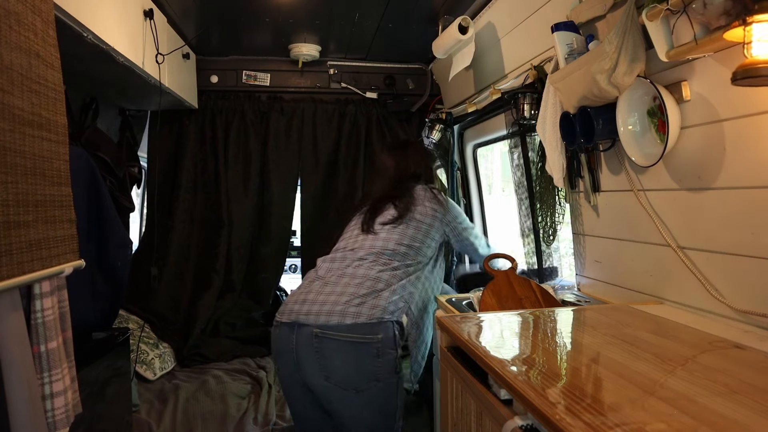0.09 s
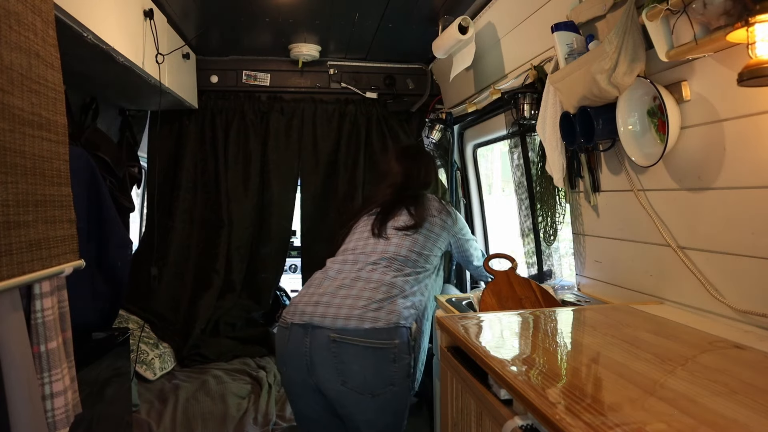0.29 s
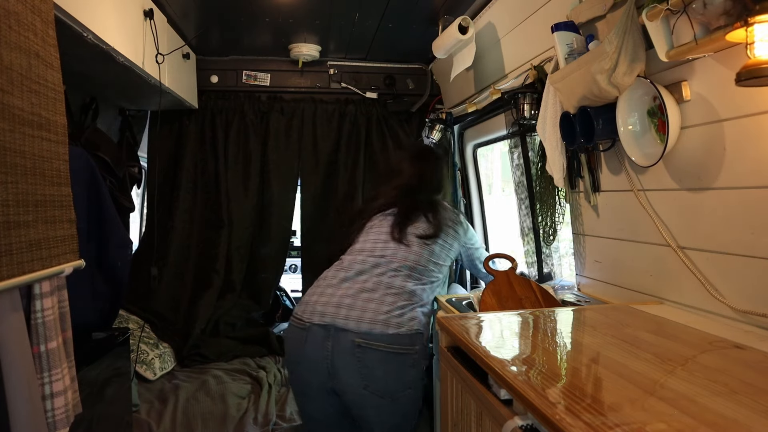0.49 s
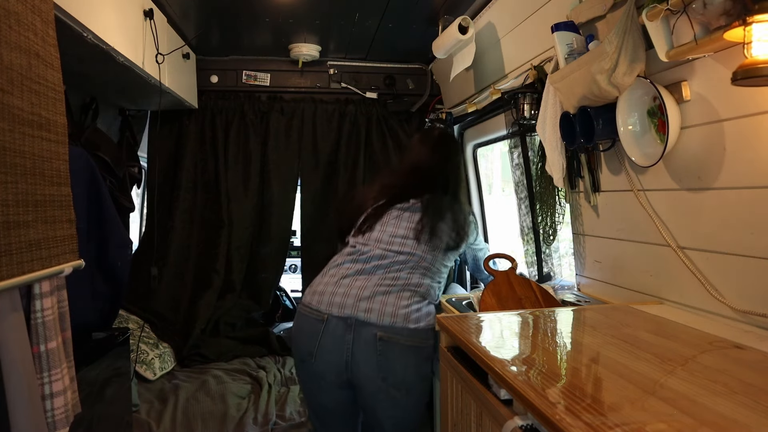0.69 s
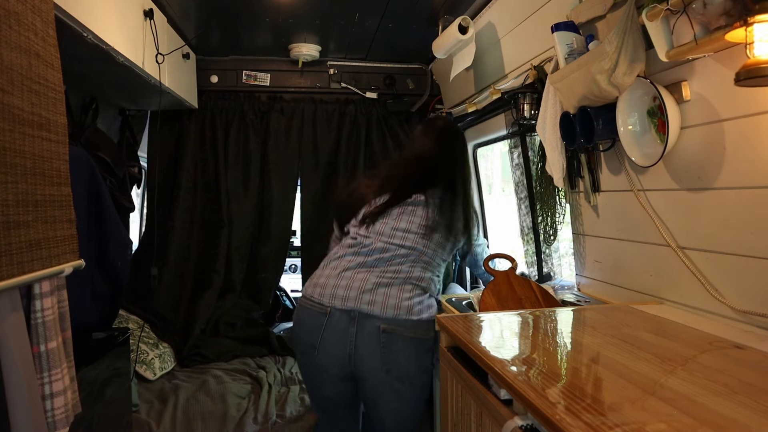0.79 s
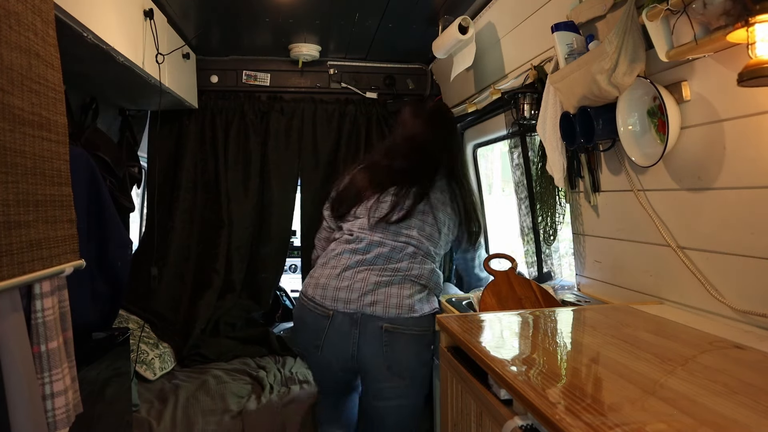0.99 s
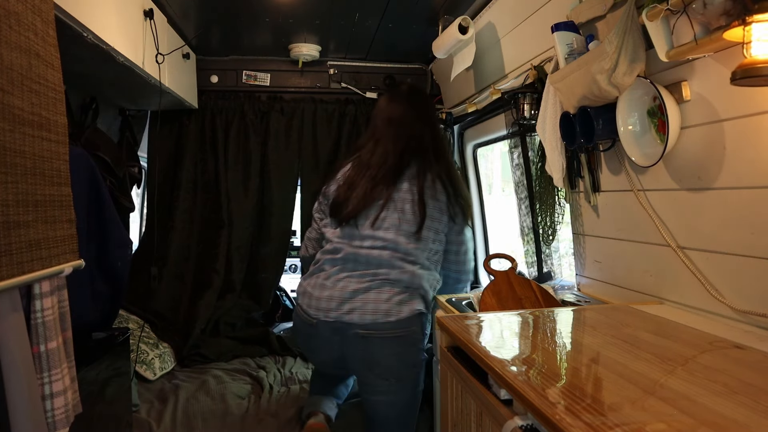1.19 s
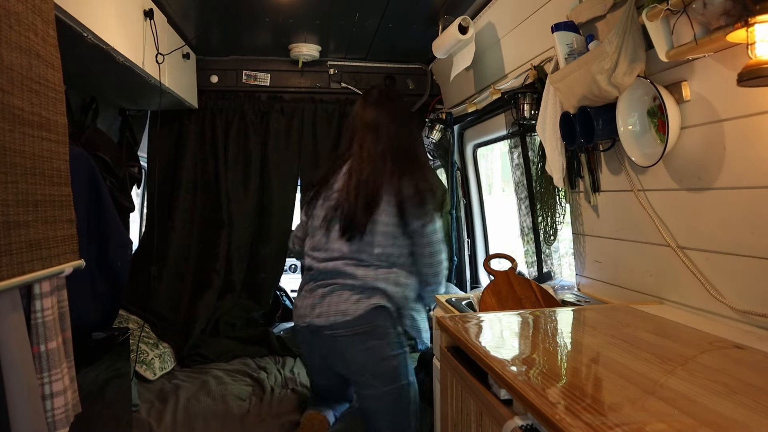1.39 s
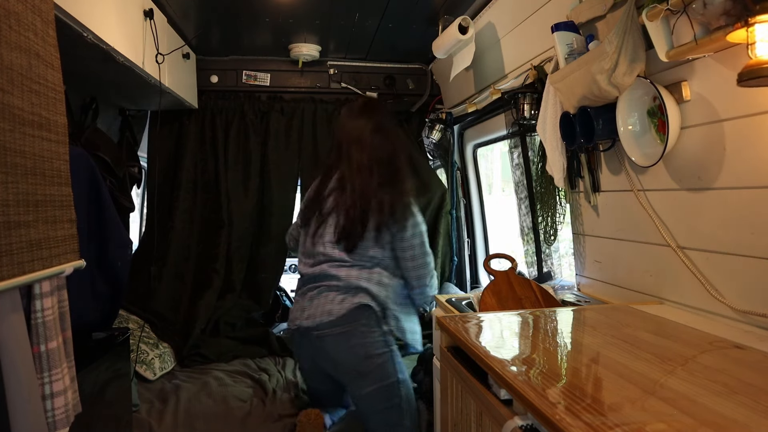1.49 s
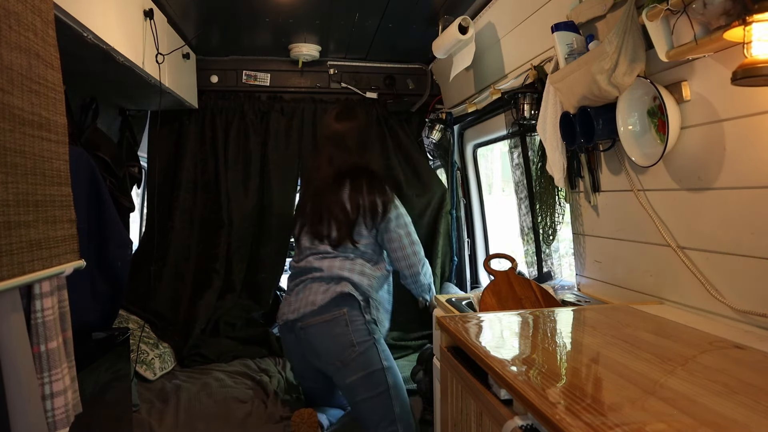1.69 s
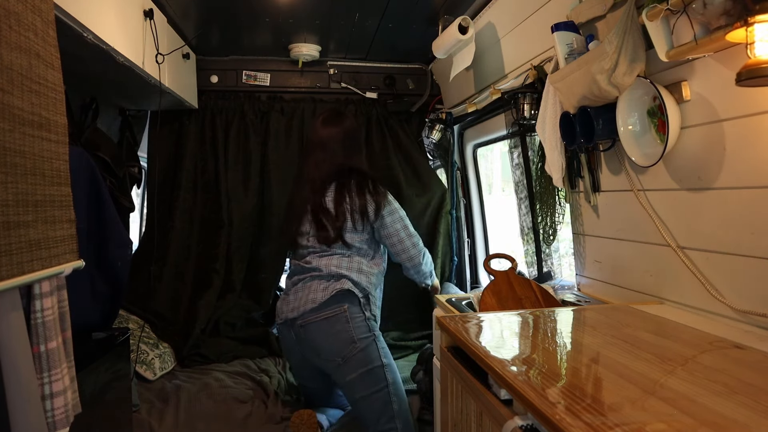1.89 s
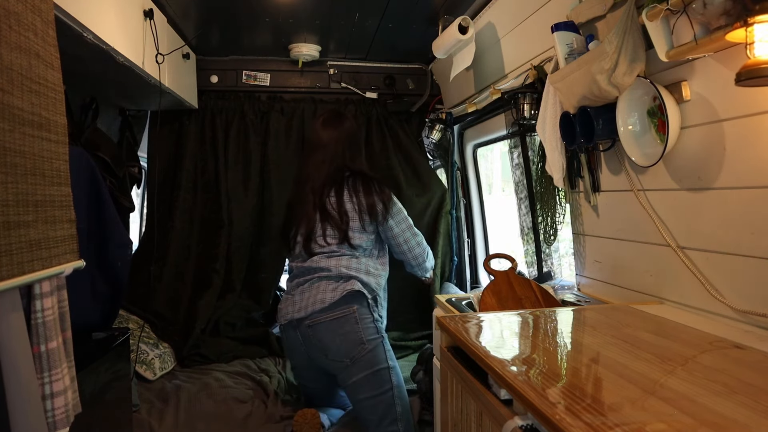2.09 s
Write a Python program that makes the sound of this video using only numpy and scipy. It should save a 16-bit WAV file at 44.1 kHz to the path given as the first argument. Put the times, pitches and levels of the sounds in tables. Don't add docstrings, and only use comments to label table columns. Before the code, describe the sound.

Heavy cloth is rustled and folded very close to the microphone in a small parked van; a loud, sharp wooden knock comes early, then soft thuds, light taps and stick-slip jerks over low rumble.

```python
import sys
import numpy as np
from scipy import signal
from scipy.fft import rfft, irfft
from scipy.io import wavfile
from scipy.ndimage import uniform_filter1d

SR = 44100
rng = np.random.default_rng(int(sys.argv[2]) if len(sys.argv) > 2 else 0)


def master_out(mix):
    frames = np.transpose(np.atleast_2d(mix))
    ceiling = np.clip(frames, -1, 1)
    pcm = np.round(ceiling * 32767).astype(np.int16)
    wavfile.write(sys.argv[1], SR, pcm)


def ratio_of_db(decibels):
    return 10 ** (np.asarray(decibels, float) / 20)


N = 92610


def evened(x):
    return x / np.sqrt(np.mean(x ** 2) + 1e-20)


def read(points, hz):
    f, value = np.transpose(points)
    return np.interp(np.log(hz + 1), np.log(f + 1), value)


def colour(x, points):
    gain = ratio_of_db(read(points, np.fft.rfftfreq(2 * len(x), 1 / SR)))
    return irfft(rfft(np.r_[x, x[::-1]]) * gain)[:len(x)]


def add(mix, s, sound):
    part = mix[round(s * SR):][:len(sound)]
    part += sound[:len(part)]


def resonate(x, hz, width):
    turn = np.exp(2j * np.pi * hz * np.arange(len(x)) / SR)
    r = np.exp(-np.pi * width / SR)
    return 2 * (turn * signal.lfilter([1 - r], [1, -r], x / turn)).real


def body_noise(noise, hz, width, second_width):
    return resonate(resonate(noise, hz, width), hz, second_width)


def swing(hz, count):
    return np.sin(2 * np.pi * hz * np.arange(count) / SR)


def drift(span_s):
    size = round(span_s * SR)
    return evened(uniform_filter1d(uniform_filter1d(rng.standard_normal(N), size), size))


def burst(sound, rise_s, t60):
    t = np.arange(len(sound)) / SR
    x = sound * (1 - np.exp(-t / rise_s)) * ratio_of_db(-60 * t / max(t60, 0.01))
    return x / abs(x).max()


def cloth():
    # time in seconds, effort in dB, brightness in dB.
    handling = [(0, -47.5, 20), (0.199, -45, 8), (0.312, -40.5, 6.5), (.35, -52.5, -8), (0.468, -46, 24.5),
                (.61, -47.5, 16), (.78, -47, -6), (.95, -44, 19), (1.08, -45, 18), (1.2, -61, 23),
                (1.362, -51.5, -4.5), (1.479, -45.5, 8), (1.561, -37, -17.5), (1.671, -40.5, -10),
                (1.72, -51, -19.5), (1.9, -46.5, 0.5), (1.98, -72, -54), (2.1, -53.5, -39)]
    # frequency in Hz, level in dB per Hz.
    weave = [(100, -63), (300, -5), (900, -1.5), (2100, 0), (3200, -8.5), (5500, -22.5), (9500, -38),
             (15500, -67.5)]
    bright_hz, fibres_per_s, fibre_share = 7130, 3000, 0.61
    fibre_spread_db, patchy_db, flutter_db = 1, 3, -0.17

    slip_size = ratio_of_db(fibre_spread_db * np.minimum(rng.exponential(1, N), 4))
    slips = slip_size * (rng.random(N) < fibres_per_s / SR)
    fibres = evened(slips * rng.standard_normal(N))
    rub = fibre_share * fibres + (1 - fibre_share) * rng.standard_normal(N)
    rub = rub * ratio_of_db(flutter_db * drift(0.0053))

    hz, t, z = signal.stft(rub, SR, nperseg=256)
    chance = rng.standard_normal(z.T.shape)
    patches = evened(uniform_filter1d(uniform_filter1d(chance, 10, 0), 3, 1)).T
    z = z * ratio_of_db(read(weave, hz)[:, None] + patchy_db * patches)
    level = np.sqrt(np.mean(signal.istft(z, SR, nperseg=256)[1] ** 2))

    s, effort_db, bright_db = np.transpose(handling)
    upper = 1 / (1 + (bright_hz / (hz + 1)) ** 4)
    z = z * ratio_of_db(np.interp(t, s, effort_db) + 0.5 + upper[:, None] * np.interp(t, s, bright_db))
    return signal.istft(z, SR, nperseg=256)[1][:N] / level


def knock():
    # frequency in Hz, level in dB, t60 in seconds.
    wood = [(330, -21.5, 0.044), (440, -13, 0.1), (763, -20.5, 0.55), (879, 2, 0.035), (973.5, 5, 0.024),
            (1047, -16, 0.13), (1117, 5.5, 0.023), (1535, -1, 0.029), (1760, 3.5, 0.023),
            (2080, -1.5, 0.076), (2298, 6.5, 0.014), (2790, -18, 0.064), (3960, -43, .04),
            (4400, -39.5, .04)]
    # delay in seconds, level in dB.
    bounces = [
        (0, -18.5),
        (.0011, 4.5),
        (.004, -12),
        (.0075, -5),
        (0.011, -7),
        (0.015, -22.5),
        (.02, -40.5),
    ]
    # frequency in Hz, level in dB per Hz.
    crack_spectrum = [(1500, -18), (3500, 11), (5000, -9), (8000, 8), (15800, -11)]
    # frequency in Hz, gain in dB.
    knock_tone = [(60, -4), (250, 0), (16000, -6)]
    knock_s, knock_db, blow_rise_s = 0.2124, -10.5, 0.0002
    crack_db, crack_rise_s, crack_t60_s = -25, 0.00013, 0.013

    t = np.arange(SR // 2) / SR
    ring = sum(ratio_of_db(db - 60 * t / t60) * np.sin(2 * np.pi * hz * t) for hz, db, t60 in wood)
    ring = ring * (1 - np.exp(-(t / blow_rise_s) ** 2))
    out = np.zeros(N)
    for delay, db in bounces:
        add(out, knock_s + delay, ratio_of_db(knock_db + db) * ring)
    crack = burst(colour(rng.standard_normal(2048), crack_spectrum), crack_rise_s, crack_t60_s)
    add(out, knock_s + 0.0028, ratio_of_db(crack_db) * crack)
    return colour(out, knock_tone)


def thuds():
    # start in seconds, peak in dB, body in Hz, t60 in seconds.
    floor_hits = [(0.263, -28, 105, 0.023), (0.284, -24, 326, 0.07), (0.298, -34, 434, 0.053),
                  (0.311, -38.5, 302, 0.072), (0.378, -29.5, 166.7, 0.28), (.415, -23.5, 286.7, 0.12),
                  (.418, -21, 161, 0.044), (0.456, -31.5, 81.6, 0.046), (0.511, -31, 472, 0.056),
                  (0.549, -29, 149.2, 0.04), (0.835, -38, 78.5, 0.09), (.79, -40.5, 126.6, 0.24),
                  (1.015, -29, 196, 0.025), (1.07, -29.5, 268, 0.039), (1.163, -32, 250, 0.026),
                  (1.40, -39.5, 68, 0.16), (1.529, -26, 195.8, 0.095), (1.578, -33.5, 302, 0.17),
                  (1.59, -28.5, 905, 0.26), (1.675, -28.5, 798, 0.1), (1.631, -32.5, 106, 0.037),
                  (1.75, -40.5, 557, 0.091), (0.772, -31.5, 242, 0.13), (1.612, -30, 278.5, 0.1),
                  (1.897, -32.5, 116, 0.12), (1.889, -25, 863, 0.1), (2.027, -34, 88, 0.099),
                  (2.079, -30.5, 193, 0.13)]
    rise_s, wide, roughness = 0.0046, 0.45, 0.55
    upper_ratio, upper_db = 1.7, -2
    out = np.zeros(N)
    for s, db, hz, t60 in floor_hits:
        n = rng.standard_normal(9000)
        body = evened(body_noise(n, hz, wide * hz, 2 * wide * hz))
        upper = evened(body_noise(n, upper_ratio * hz, hz, hz))
        rough = roughness * hz / 250 * (body + ratio_of_db(upper_db) * upper)
        add(out, s, ratio_of_db(db) * burst(swing(hz, len(n)) + rough, rise_s, t60))
    return out


def taps():
    # start in seconds, peak in
    # dB, body in Hz, t60 in seconds.
    small_things = [(0.175, -34, 1630, 0.052), (1.54, -24.5, 1950, 0.041), (0.415, -24.5, 900, 0.12),
                    (1.614, -47.5, 1750, 0.13), (0.788, -34, 1010, 0.25), (0.811, -26, 1850, 0.044),
                    (0.2153, -10, 2100, 0.066), (0.886, -35.5, 1390, 0.087), (0.994, -28.5, 1890, 0.2),
                    (1.058, -27, 2110, 0.022), (1.169, -35, 2920, 0.1), (1.393, -25.5, 1744, 0.044),
                    (1.464, -40, 1042, 0.13), (1.522, -30.5, 1534, 0.06), (1.568, -27, 1647, 0.03),
                    (1.59, -28.5, 1596, 0.089), (1.678, -26.5, 1540, 0.025), (1.816, -33.5, 2300, 0.05),
                    (1.886, -29.5, 1960, 0.029), (1.931, -33, 1840, 0.062), (1.952, -32, 880, 0.038),
                    (2.02, -34.5, 1480, 0.074), (2.081, -38.5, 1480, 0.036)]
    rise_s, wide = 0.00095, 0.2
    out = np.zeros(N)
    for s, db, hz, t60 in small_things:
        n = rng.standard_normal(6000)
        body = evened(body_noise(n, hz, wide * hz, 2 * wide * hz))
        air = evened(body_noise(n, hz, 2 * hz, 2 * hz))
        add(out, s, ratio_of_db(db) * burst(body + air, rise_s, t60))
    return out


def jerks():
    # start in seconds, peak in dB, panel in Hz, t60 in seconds.
    slips = [(.799, -30.5, 315, 0.015), (1.08, -36, 410, 0.008), (1.088, -37, 505, .03),
             (1.541, -30, 242, 0.04), (1.6805, -35.5, 1480, 0.0084), (1.813, -38.5, 560, 0.052),
             (1.83, -26.5, 557, 0.016), (1.837, -28, 656, 0.013), (1.844, -26.5, 481, 0.01),
             (1.852, -26, 606, .035), (1.859, -27.5, 670, 0.016), (1.865, -28, 454, 0.024),
             (1.888, -28.5, 260, 0.034), (1.893, -35, 248, 0.064), (1.937, -33.5, 400, 0.011),
             (1.955, -38, 260.6, 0.022), (.276, -20.5, 340, 0.026), (.764, -36, 77.5, 0.11),
             (1.795, -40, 91.5, .08), (1.905, -32.5, 573, 0.035), (2.035, -37, 255, 0.056)]
    rise_turns = 0.54
    out = np.zeros(N)
    for s, db, hz, t60 in slips:
        add(out, s, ratio_of_db(db) * burst(swing(hz, 4000), rise_turns / hz, t60))
    return out


def creases():
    # start in seconds, peak in dB, t60 in seconds, pitch in Hz.
    ticks = [(.012, -61, 0.04, 13000), (0.047, -46, .04, 5000), (0.091, -47, 0.036, 7300),
             (0.292, -43, 0.4, 4650), (0.3657, -45.5, 0.016, 8300), (.599, -50, 0.099, 6500),
             (0.717, -47, 0.025, 5500), (0.799, -55, 0.034, 8900), (0.8155, -37, 0.071, 3700),
             (0.863, -45, 0.026, 7400), (.9607, -49, 0.057, 9050), (1.06, -48, 0.03, 4540),
             (1.075, -47, 0.024, 9700), (1.598, -48.5, 0.3, 4300), (1.17, -46, 0.045, 4300),
             (1.39, -57, 0.083, 7500), (1.5, -44, 0.054, 5100), (1.571, -59, .04, 11000),
             (1.644, -57, 0.027, 11100), (1.114, -65, 0.018, 7400), (1.171, -54.5, 0.015, 11000),
             (1.89, -73, .1, 11000), (1.814, -51, 0.09, 4500), (1.8846, -49, 0.3, 4440),
             (1.939, -43.5, 0.028, 4400)]
    wide, rise_s = 0.5, 0.0015
    out = np.zeros(N)
    for s, db, t60, hz in ticks:
        snap = body_noise(rng.standard_normal(3000), hz, wide * hz, wide * hz)
        add(out, s, ratio_of_db(db) * burst(snap, rise_s, t60))
    return out


def squeak():
    start_s, length_s, hz, width_hz, level_db = 1.495, 0.055, 13300, 700, -73
    n = rng.standard_normal(round(length_s * SR))
    out = np.zeros(N)
    add(out, start_s, ratio_of_db(level_db) * np.hanning(len(n)) * evened(body_noise(n, hz, width_hz, width_hz)))
    return out


def small_hits():
    # frequency in Hz,
    # gain in dB.
    hits_tone = [(30, 13), (70, 2), (2500, -1.84), (5000, -12), (12000, -15)]
    return colour(thuds() + taps() + jerks(), hits_tone) + creases() + squeak()


def cabin():
    # frequency in Hz, level in dB per Hz.
    air_spectrum = [(20, -6.5), (60, 6), (130, -9.5), (800, -14.5), (2200, -21), (4000, -32.5), (9000, -45),
                    (15500, -67)]
    air_db = -47
    rumble_hz, rumble_width_hz, rumble_db = 59.7, 17, -51.5
    wander_hz, hum_db, swell_db = 3.15, -48, 6
    air = evened(colour(rng.standard_normal(N), air_spectrum))
    rumble = evened(body_noise(rng.standard_normal(N), rumble_hz, rumble_width_hz, 2 * rumble_width_hz))
    hum = np.sin(2 * np.pi * np.cumsum(rumble_hz + wander_hz * drift(0.058)) / SR)
    hum = hum * ratio_of_db(hum_db + swell_db * drift(0.1))
    return ratio_of_db(air_db) * air + ratio_of_db(rumble_db) * rumble + hum


def room(x):
    # frequency in Hz, t60 in seconds.
    decay = [(200, 0.39), (800, 0.27), (2000, 0.082), (6000, 0.046)]
    echoes = rng.standard_normal(SR // 2) * (np.arange(SR // 2) > 200)
    hz, t, z = signal.stft(echoes, SR, nperseg=256)
    z = z * ratio_of_db(-60 * t / read(decay, hz)[:, None])
    tail = signal.istft(z, SR, nperseg=256)[1]
    return signal.fftconvolve(x, tail / np.linalg.norm(tail))[:N]


def scene():
    # frequency in Hz, side over mid in dB.
    ports = [(60, -36), (500, -18.5), (1000, -13.5), (2000, -11.5), (4500, 3.5), (8000, 0), (14000, -12)]
    scattering = [(60, -41), (300, -18), (1500, -22.5), (5000, -5), (14000, 8)]
    apart = [(60, -24), (500, -5.5), (2000, -15), (5000, -10.5), (14000, -2.5)]
    # frequency in Hz, level in dB.
    lean = [(300, -44), (2500, -44), (4500, -18), (14000, -15)]
    knock_room_db, hits_room_db, scatter_s = -14.5, -15.5, 0.012

    blow, hits = knock(), small_hits()
    soft = cloth() + hits + cabin() + room(ratio_of_db(knock_room_db) * blow + ratio_of_db(hits_room_db) * hits)
    mid = soft + blow
    scatter = rng.standard_normal(2000) * np.exp(-np.arange(2000) / (scatter_s * SR))
    scattered = signal.fftconvolve(soft, scatter / np.linalg.norm(scatter))[:N]
    lagging = signal.hilbert(np.r_[mid, mid[::-1]]).imag[:N]
    side = colour(lagging, ports) + colour(scattered, scattering) - colour(mid, lean)
    side = side + colour(cloth() + cabin(), apart)
    return np.array([mid + side, mid - side])


def low_pass(x):
    return signal.sosfilt(signal.butter(12, 15750, fs=SR, output="sos"), x)


def record(dry):
    end_fade_s = 0.004
    fade = np.minimum(np.arange(N)[::-1] / SR / end_fade_s, 1)
    return low_pass(np.clip(dry, -1, 1) * fade)


dry = scene()
out = record(dry)
master_out(out)
```